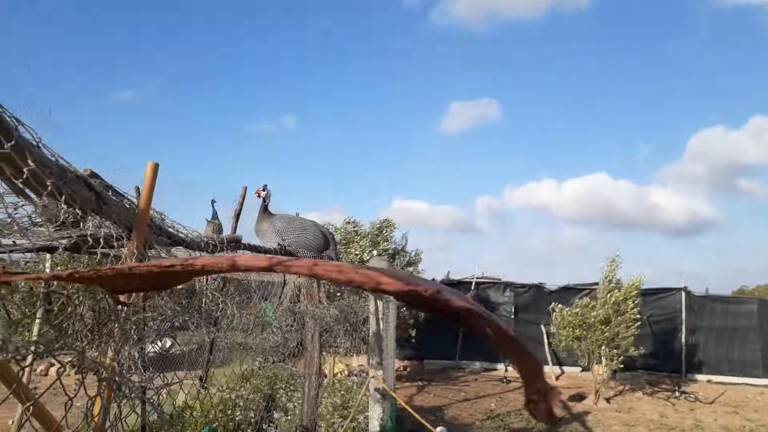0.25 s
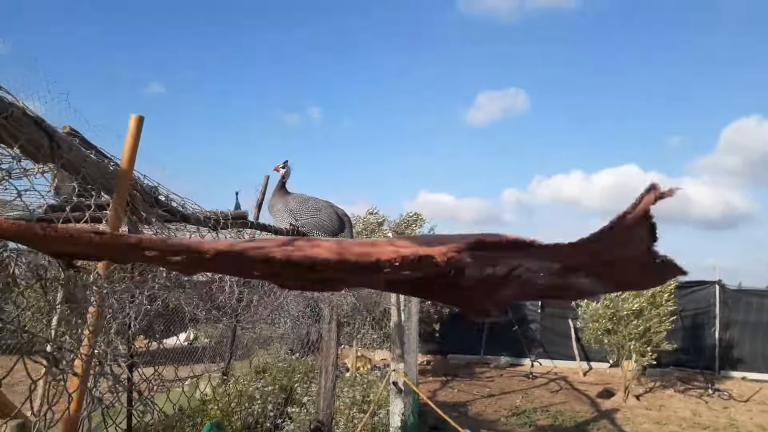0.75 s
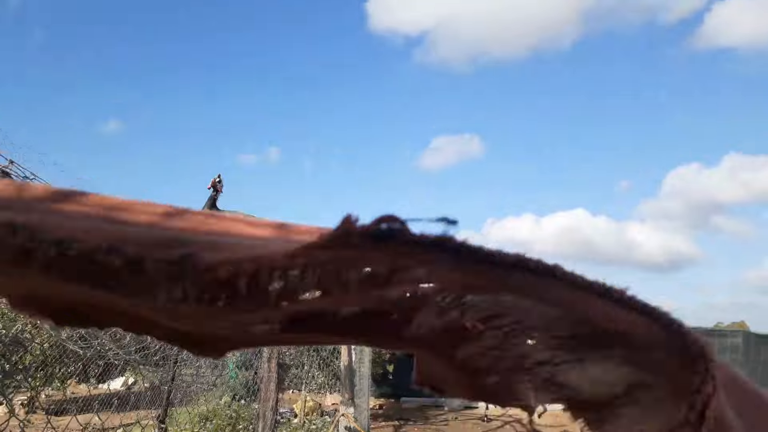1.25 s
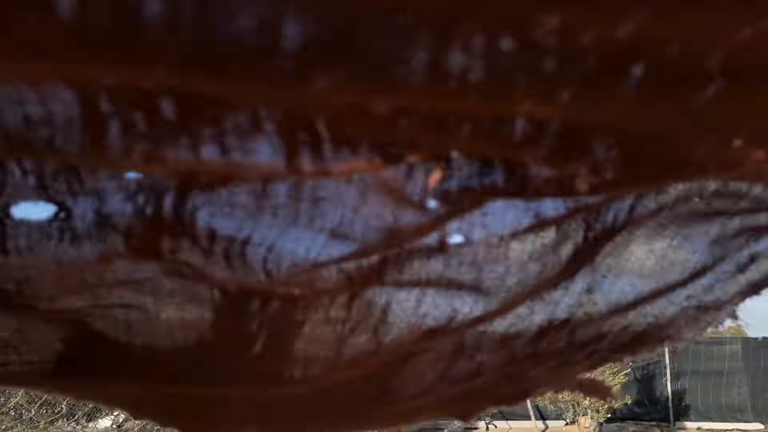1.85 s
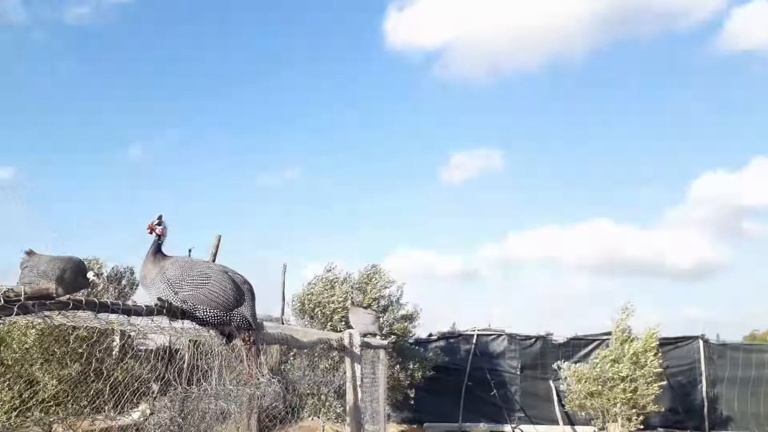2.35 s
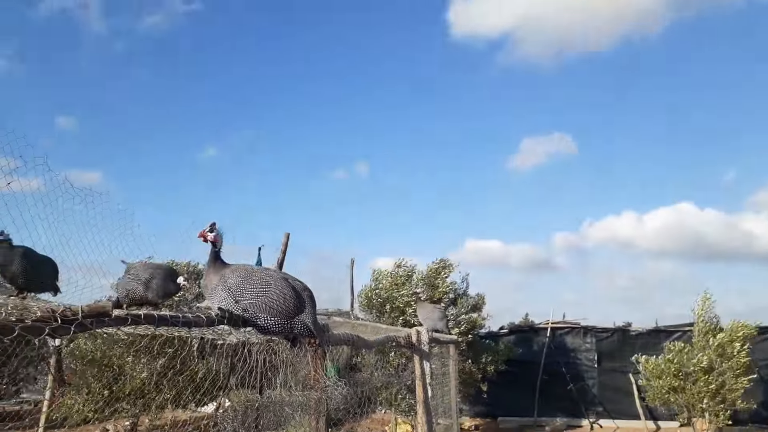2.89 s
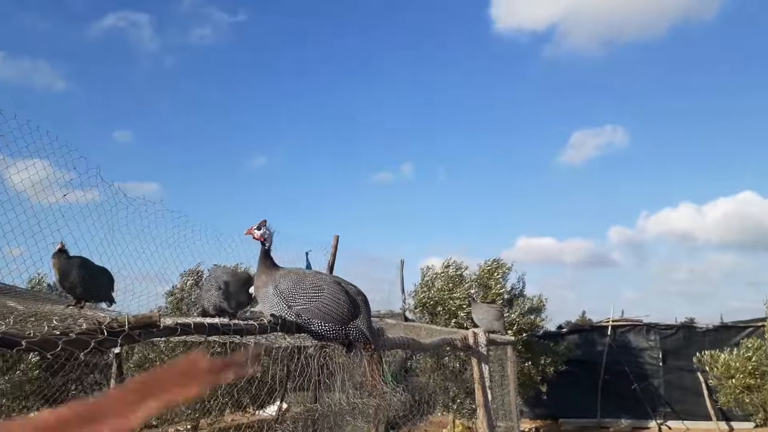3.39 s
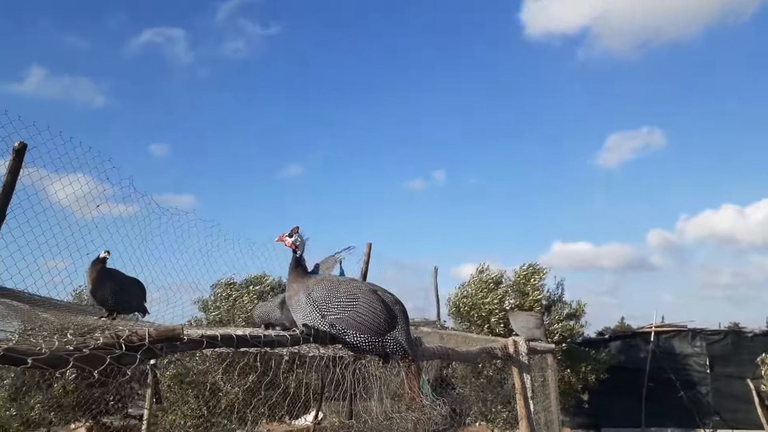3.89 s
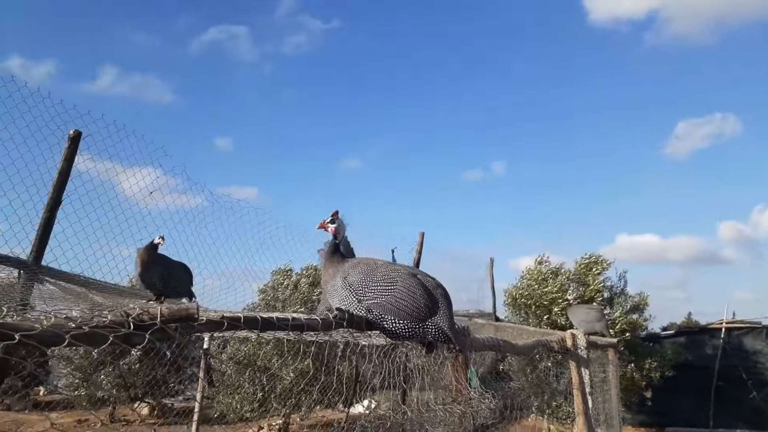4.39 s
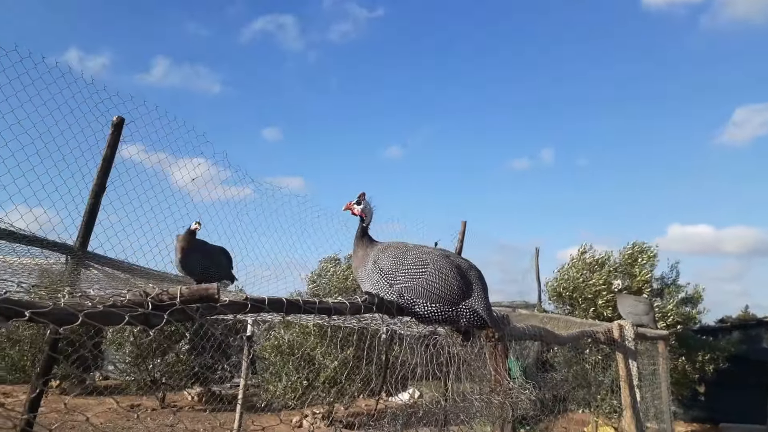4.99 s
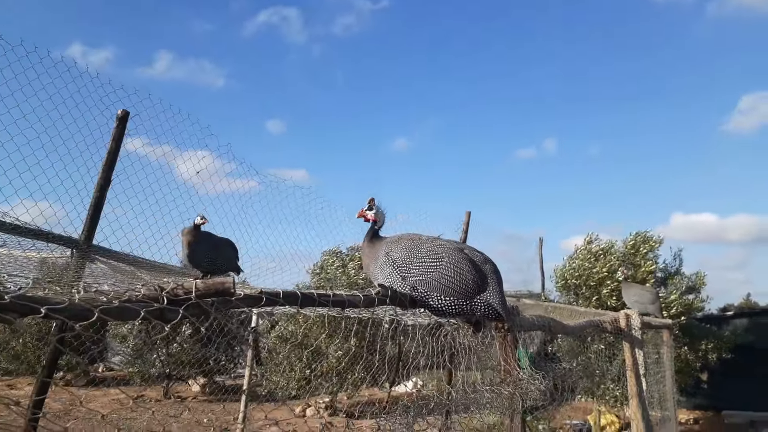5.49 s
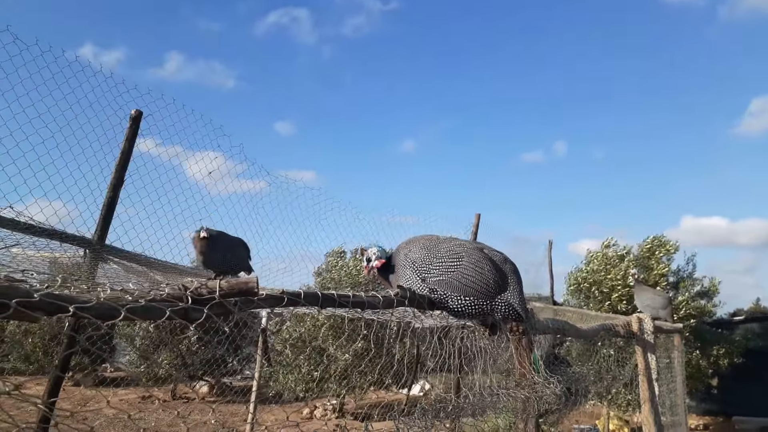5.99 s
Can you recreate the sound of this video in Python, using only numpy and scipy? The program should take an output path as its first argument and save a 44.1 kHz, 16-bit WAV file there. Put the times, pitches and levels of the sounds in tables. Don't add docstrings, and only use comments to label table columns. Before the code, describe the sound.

Outdoors in a wire pen, a guineafowl a few metres to the left fires off harsh, buzzy barks, then a rough scream, a hoarse two-part rasp and a short rolling trill. More quick barks follow, mixed with duller clucks, perhaps from a second bird, and small squeaks. Wind thumps hard on the handheld stereo microphone at first, then eases to softer buffeting. The yard adds only a faint short echo.

```python
import sys
import numpy as np
from scipy import signal
from scipy.fft import rfft, irfft, next_fast_len
from scipy.io import wavfile
from scipy.ndimage import uniform_filter1d, map_coordinates

SR = 44100
rng = np.random.default_rng(int(sys.argv[2]) if len(sys.argv) > 2 else 0)


def log_audio(samples):
    frames = np.atleast_2d(samples).T
    limited = np.clip(frames, -1, 1)
    pcm = np.round(limited * 32767).astype(np.int16)
    wavfile.write(sys.argv[1], SR, pcm)


def convert_level_to_amplitude(level_db):
    exponent = np.asarray(level_db, float) / 20
    return 10 ** exponent


N = 275625


def unit(x):
    return x / np.sqrt(np.mean(np.abs(x) ** 2) + 1e-20)


def along(points, hz):
    f, v = np.transpose(points)
    return np.interp(np.log(hz + 1), np.log(f + 1), v)


def over_time(points):
    return np.interp(np.arange(N) / SR, *np.transpose(points))


def wobble(rate_hz):
    knots = rng.standard_normal(int(N * rate_hz / SR) + 4)
    return map_coordinates(knots, [np.arange(N) * rate_hz / SR])


def filtered(x, response):
    m = next_fast_len(N + SR // 2)
    return irfft(rfft(x, m) * response(np.fft.rfftfreq(m, 1 / SR)), m)[..., :N]


GUST_TOP_DB = 8


def eddies(spectrum, per_second, gust_db):
    hits = rng.random((2, N)) < per_second / SR
    pops = hits * rng.standard_normal((2, N)) * convert_level_to_amplitude(1.5 * rng.standard_normal((2, N)))
    flow = .8 * unit(pops) + .45 * rng.standard_normal((2, N))
    lumps = convert_level_to_amplitude(np.minimum(gust_db, GUST_TOP_DB)) * flow
    return unit(filtered(lumps, lambda f: convert_level_to_amplitude(along(spectrum, f))))


# (time [s], level [dB])
WIND_DB = [(0, -24), (.2, -23), (.42, -35), (.58, -26), (1.0, -23.5), (1.36, -27), (1.6, -25.5), (2.3, -28),
           (3.0, -28.5), (3.3, -33), (3.4, -58), (3.51, -48), (3.6, -27.5), (3.97, -39), (4.07, -28.5),
           (4.85, -31), (5.35, -27), (5.85, -30)]
# (time [s], level [dB])
SLOW_EDDIES_DB = [(0, -4.5), (2.2, -3.5), (2.6, 0), (4.0, -1), (4.9, -2.5), (5.3, 1.5)]
# (frequency [Hz], density [dB per Hz])
SLOW_SPECTRUM = [(20, -33), (50, -10), (150, -0.5), (350, -6), (700, -19.5), (1500, -54.5)]
# (frequency [Hz], density [dB per Hz])
SMALL_SPECTRUM = [(100, -26), (350, -2), (800, -3), (1300, -5), (2100, -21), (5000, -68)]
# (time [s], peak [dB], port [0 left, 1 right])
THUMPS = [(0.106, -9, 0), (0.117, -16, 1), (0.147, -15, 0), (0.152, -6.5, 1), (0.211, -13.5, 0),
          (0.293, -7.5, 1), (0.577, -6, 0), (0.917, -10.5, 1), (0.954, -8, 0), (1.147, -9, 1),
          (1.148, -15, 0), (1.473, -3, 1), (1.529, -16, 1), (5.331, -10, 0)]


def wind():
    def gusts(depth_db, rate_hz):
        return np.array([depth_db * wobble(rate_hz), depth_db * wobble(rate_hz)])

    shared_db = gusts(3, 9)
    slow = eddies(SLOW_SPECTRUM, 150, shared_db + gusts(2.3, 20))
    small = eddies(SMALL_SPECTRUM, 420, shared_db + gusts(2.3, 18) + gusts(3.8, 45))
    level = convert_level_to_amplitude(over_time(WIND_DB) + np.array([[.1], [-.1]]))
    brighter = unit(level) ** .43
    steady = level * (convert_level_to_amplitude(over_time(SLOW_EDDIES_DB)) * slow + convert_level_to_amplitude(-2.0) * brighter * small)
    blows = np.zeros((2, N))
    for at_s, peak_db, port in THUMPS:
        blows[int(port), round(at_s * SR)] = -convert_level_to_amplitude(peak_db + 33)
    return steady + filtered(blows, lambda f: convert_level_to_amplitude(along(SMALL_SPECTRUM, f)))


def open_air():
    return convert_level_to_amplitude(-52) * unit(filtered(rng.standard_normal((2, N)), lambda f: 1 / (f + 1500) ** 2))


# (onset [s], length [s], peak [dB], pulse rate [Hz], windpipe [Hz])
BARKS = [(.066, .062, -20, 355, 2150), (.559, .082, -18, 372, 2040), (.736, .114, -17, 378, 1960),
         (1.631, .09, -22, 347, 2300), (3.002, .05, -17.5, 362, 2150), (3.101, .058, -16.5, 362, 2120),
         (3.376, .092, -14.5, 377, 2000), (3.615, .118, -20, 364, 2240), (3.874, .094, -19, 364, 2200),
         (4.685, .056, -19, 350, 2180), (4.791, .058, -18, 361, 2260), (4.906, .058, -17, 361, 2250),
         (5.051, .072, -19, 350, 2000), (5.389, .082, -19.5, 411, 2450)]
# (onset [s], length [s], peak [dB], pulse rate [Hz], windpipe [Hz])
SWELLS = [(.182, .058, -19, 355, 2170), (.285, .07, -19, 355, 2120), (.925, .041, -18, 378, 2200),
          (2.455, .055, -18, 338, 2350), (3.209, .058, -14, 362, 2146), (4.168, .084, -23.5, 342, 2150),
          (5.812, .068, -16, 368, 2220), (6.15, .064, -16, 367.5, 2250)]
# (onset [s], length [s], peak [dB], pulse rate [Hz], windpipe [Hz])
CLUCKS = [(.26, .02, -33, 355, 1900), (2.147, .062, -22.5, 338, 1850), (2.235, .058, -23.5, 338, 2050),
          (4.114, .034, -49, 342, 1900), (4.484, .062, -25, 330, 2200), (4.587, .062, -22, 350, 2080),
          (5.286, .082, -26, 405, 1800), (5.582, .092, -25.5, 335, 2040), (5.976, .068, -27.5, 368, 2120)]
# (onset [s], length [s], peak [dB], pulse rate [Hz], windpipe [Hz])
SIGHS = [
    (.42, .088, -17, 372, 2060),
    (1.451, .112, -15, 378, 1980),
    (2.335, .066, -22.5, 338, 1850),
    (2.528, .06, -22, 338, 2100),
    (4.372, .095, -25, 330, 2150),
]
# (attack [s], onset re crest [dB], after attack re crest [dB], release [s],
# throat re beak [dB], windpipe sink [share])
BARK = (.007, -12, -1, .032, -9, .12)
SWELL = (.006, -15, -6, .028, -7, .09)
CLUCK = (.006, -12, -1.5, .03, -4.5, .03)
SIGH = (.01, -13, -4, .062, -7, .08)
FADE_DB, SILENT_DB = -22, -85
THROAT_GAINS_DB, FLUTTER_DB = -6, 1.1
BEAK_HZ, BEAK_FALLS, BEAK_SCATTER = 4600, .06, .012
RATE_FALLS = .02
ROUGH, EASY_HZ, ROUGH_PER_HZ, CLEAREST = .36, 365, .006, .27


def short_notes(t):
    kinds = ((BARKS, BARK), (SWELLS, SWELL), (CLUCKS, CLUCK), (SIGHS, SIGH))
    rows = np.array(sorted((*note, *kind) for notes, kind in kinds for note in notes))
    rows = np.c_[rows, rng.standard_normal((len(rows), 1))]
    now = np.maximum(np.searchsorted(rows[:, 0], t, "right") - 1, 0)
    (start, length, peak_db, rate_hz, pipe_hz, attack, onset_db, open_db,
     release, throat_db, sinks, chance) = rows[now].T
    age = t - start
    release = np.minimum(release, .7 * length)

    def ramp(since, lasts):
        return np.clip((age - since) / lasts, 0, 1)

    hold = np.abs(length - release - attack) + 1e-3
    rise_db = onset_db * (1 - ramp(0, attack))
    rise_db = rise_db + open_db * ramp(0, attack) * (1 - ramp(attack, hold))
    level_db = peak_db + rise_db + FADE_DB * ramp(length - release, release)
    level_db = level_db + (SILENT_DB - level_db) * ramp(length, .006)
    level_db = np.where(age < 0, SILENT_DB, level_db)
    done = ramp(0, length)
    rate_now_hz = rate_hz * (1 - RATE_FALLS * (done - .4))
    pipe_hz = pipe_hz * (1 - sinks * done)
    beak_hz = BEAK_HZ * (1 - BEAK_FALLS * done + BEAK_SCATTER * chance)
    rough = np.maximum(ROUGH + ROUGH_PER_HZ * (EASY_HZ - rate_hz), CLEAREST)
    throat_db = throat_db + THROAT_GAINS_DB * (done - .5)
    trill_db = np.full(N, FLUTTER_DB)
    return np.array([level_db, rate_now_hz, pipe_hz, beak_hz, rough, throat_db, trill_db, done])


# (time [s], level [dB], pulse rate [Hz], windpipe [Hz], beak [Hz])
SCREAM = [
    (.97, -33, 371, 1950, 4450),
    (1.004, -14.5, 371, 1950, 4550),
    (1.042, -14, 371, 1840, 4630),
    (1.128, -20, 371, 1900, 4400),
    (1.24, -18, 371, 1850, 4450),
    (1.282, -22, 370, 2050, 4300),
    (1.303, -18.5, 370, 2220, 4545),
    (1.311, -31, 370, 2250, 4600),
    (1.351, -35, 370, 2100, 4400),
]
# (time [s], level [dB], pulse rate [Hz], windpipe [Hz], beak [Hz])
RASP = [
    (1.705, -26, 347, 1900, 4300),
    (1.749, -29, 347, 1900, 4200),
    (1.79, -21.5, 347, 2090, 4400),
    (1.897, -25, 345, 1900, 4150),
    (1.922, -15, 372, 2099, 4680),
    (1.985, -23, 370, 1780, 4550),
    (2.013, -22, 337, 1730, 4300),
    (2.081, -28, 333, 1660, 4250),
    (2.099, -43.5, 333, 1650, 4250),
]
# (time [s], level [dB], pulse rate [Hz], windpipe [Hz], beak [Hz])
ROLL = [
    (2.626, -40, 351, 1757, 4400),
    (2.634, -25, 351, 1757, 4360),
    (2.927, -23.5, 351, 1764, 4370),
    (2.959, -39.5, 351, 1764, 4300),
]
# (roughness [0-1], throat re beak [dB], trill depth [dB])
SCREAM_VOICE, RASP_VOICE, ROLL_VOICE = (.26, -12, 1), (.33, -2, .4), (.22, -9, 4.5)


def performance(t):
    controls = short_notes(t)
    for call, voice in ((SCREAM, SCREAM_VOICE), (RASP, RASP_VOICE), (ROLL, ROLL_VOICE)):
        s, *curves = np.transpose(call)
        on = (t >= s[0]) & (t <= s[-1])
        moving = [np.interp(t[on], s, c) for c in curves]
        steady = [np.full(on.sum(), v) for v in (*voice, .5)]
        controls[:, on] = moving + steady
    return controls


def syrinx(rate_hz, rough, trill_db):
    jitter = .006 * wobble(40) + .06 * rough * wobble(300)
    cycles = np.cumsum(rate_hz * (1 + jitter)) / SR
    shut = np.diff(np.floor(cycles), prepend=0)
    clicks = unit(shut * convert_level_to_amplitude((.43 + 1.75 * rough) * wobble(250)))
    puffs = unit(np.exp(-(cycles % 1) / .7) * rng.standard_normal(N))
    trill = np.cos(2 * np.pi * 39.5 * (np.arange(N) / SR - 2.785))
    return clicks, puffs, trill_db * (trill - .5)


def resonances(modes, floor_hz):
    def response(f):
        total = 0
        for k, (centre, width, db) in enumerate(modes):
            total = total + (-1) ** k * convert_level_to_amplitude(db) * 1j * f * width / (centre ** 2 - f * f + 1j * f * width)
        return (1j * f / (floor_hz + 1j * f)) ** 4 * total
    return response


def moving_resonance(x, hz, width_hz):
    turn = np.exp(2j * np.pi * np.cumsum(hz) / SR)
    b, a = signal.butter(3, width_hz / SR)
    return unit(np.real(signal.lfilter(b, a, x / turn) * turn))


# (time [s], head turned away [dB], beak gape [dB], throat swelling [dB])
POSTURE = [(0, 3.5, -32, -4), (.5, -3.5, -27, -7), (.8, 1, -17, -7), (1.15, -2, -20, -5), (1.3, 2, -15, 0),
           (1.5, 2.5, -16, -5), (1.82, -4.5, -19, -3), (1.95, 3, -13, -7), (2.3, 7.5, -22, 0),
           (2.47, 1.5, -18, 3), (2.62, 8.5, -11, 1), (2.93, 6.5, -10, -1), (3.1, 0, -13, -7),
           (3.9, 3, -13, -8), (4.2, 4, -19, -3), (4.62, 6, -4, 2), (5.0, 6, -14, 0), (5.9, 5, -21, -3)]
# (frequency [Hz], width [Hz], level [dB])
THROAT = [(2750, 450, -11), (3306, 424, -5)]
# (frequency [Hz], width [Hz], level [dB])
BROW = [(6230, 450, -3.5), (6990, 400, -5)]
# (frequency [Hz], density [dB per Hz])
HISS = [(7000, -40), (7900, 3), (9500, 5.5), (11500, 7.5), (12500, 3.5), (15600, -9)]
PIPE_GAINS_DB, HISS_GAINS_DB = 2.5, 4


def chatter():
    t = np.arange(N) / SR
    level_db, rate_hz, pipe_hz, beak_hz, rough, throat_db, trill_db, done = performance(t)
    s, turn_db, gape_db, swell_db = np.transpose(POSTURE)
    pipe_db = np.interp(t, s, turn_db) + PIPE_GAINS_DB * (done - .5)
    throat_db = throat_db + np.interp(t, s, swell_db)
    hiss_db = np.interp(t, s, gape_db) + HISS_GAINS_DB * (done - .5)
    rough = np.clip(rough, 0, 1)
    rate_hz = rate_hz * (1 + .0016 * (np.clip(level_db, -45, 0) + 20))
    clicks, puffs, trill = syrinx(rate_hz, rough, trill_db)

    def mix(breath):
        breath = np.clip(breath, 0, 1)
        return np.sqrt(1 - breath) * clicks + np.sqrt(breath) * puffs

    def brow_response(f):
        return resonances(BROW, 5200)(f) / (1 + (f / 7500) ** 16)

    sag = 1 + .004 * (np.clip(level_db, -42, -22) + 22)
    pipe = moving_resonance(mix(.4 * rough), sag * pipe_hz + 50, width_hz=400)
    air_sac = moving_resonance(mix(.4 * rough), .74 * pipe_hz, width_hz=800)
    pipe = pipe + convert_level_to_amplitude(-7.5) * air_sac
    throat = unit(filtered(mix(1.6 * rough), resonances(THROAT, 2000)))
    beak = moving_resonance(mix(1.15 * rough), sag * beak_hz, width_hz=1000)
    brow = unit(filtered(mix(.39 + rough), brow_response))
    hiss = unit(filtered(puffs + .31 * rng.standard_normal(N), lambda f: convert_level_to_amplitude(along(HISS, f))))
    upper = beak + convert_level_to_amplitude(-11.5) * brow + convert_level_to_amplitude(throat_db + 3.5) * throat + convert_level_to_amplitude(hiss_db - 1.6) * hiss
    lower = convert_level_to_amplitude(pipe_db + .45 * trill - 2.5) * pipe
    return convert_level_to_amplitude(level_db - 2.45) * (convert_level_to_amplitude(trill) * upper + lower)


# (time [s], peak [dB], second partial [Hz], length [s])
SQUEAKS = [
    (0.263, -40, 2750, 0.019),
    (.288, -26, 3200, 0.0095),
    (0.918, -36, 2700, 0.028),
    (1.631, -29, 2900, .022),
    (2.234, -27, 2780, 0.03),
    (4.373, -30, 3080, 0.049),
    (4.587, -27, 2940, 0.021),
    (5.292, -30, 3200, .066),
    (6.151, -28.5, 2950, 0.033),
]
# (multiple [1], level [dB])
SQUEAK_PARTIALS = [(1, -7), (2, 6), (3, -5), (4, -12.5)]


def squeaks():
    out, hush = np.zeros(N + SR), np.ones(N + SR)
    for at_s, peak_db, second_hz, length_s in SQUEAKS:
        u = np.arange(round(length_s * SR)) / (length_s * SR)
        glide = .00084 / length_s * np.sin(2.2 * u - .8)
        jitter = .039 * rng.standard_normal(len(u))
        phase = np.pi * np.cumsum(second_hz * (1 + glide + jitter)) / SR
        tone = 0
        for k, level_db in SQUEAK_PARTIALS:
            extra_db = 133 * length_s if k == 1 else 0
            tone = tone + convert_level_to_amplitude(level_db + extra_db) * np.sin(k * phase)
        start = round(at_s * SR)
        out[start:][:len(u)] += convert_level_to_amplitude(peak_db) * np.sin(np.pi * u ** .6) ** .7 * tone
        hush[start:][:len(u)] -= .4 * np.sin(np.pi * u)
    return out[:N], hush[:N]


# (frequency [Hz], level [dB])
LEFT_EAR_DB = [(1500, 0.5), (3000, 1.5), (4500, -5), (6000, 5), (7500, -7.5), (9500, 1)]
# (frequency [Hz], phase [rad])
BODY_LAG_RAD = [(1200, 0), (1900, -.55), (2700, -1.5), (3150, -1.3), (3700, 0)]
LEAD_S = .0004348


def direct(birds):
    side = np.array([[.5], [-.5]])

    def response(f):
        lead_rad = 2 * np.pi * f * LEAD_S / (1 + (f / 7400) ** 12) + along(BODY_LAG_RAD, f)
        return convert_level_to_amplitude(side * along(LEFT_EAR_DB, f) + 2.0) * np.exp(1j * side * lead_rad)

    return filtered(birds, response)


def scattered(x):
    z = signal.stft(x, nperseg=256)[2]
    shape = (2,) + z.shape
    field = rng.standard_normal(shape) + 1j * rng.standard_normal(shape)
    field = uniform_filter1d(field, size=5, axis=1)
    field = uniform_filter1d(field, size=24, axis=2)
    return signal.istft(z * unit(field), nperseg=256)[1][:, :N]


# (frequency [Hz], t60 [s])
YARD_T60 = [(2000, .26), (4500, 0.34), (9000, 0.3), (16000, 0.3)]


def yard(x):
    hz, t, z = signal.stft(rng.standard_normal((2, SR // 2)), SR, nperseg=256)
    decay = convert_level_to_amplitude(-60 * t / along(YARD_T60, hz)[:, None])
    tail = signal.istft(z * decay, SR, nperseg=256)[1]
    tail = tail / np.linalg.norm(tail[0])
    delayed = np.pad(x, (300, 0))[None]
    return signal.fftconvolve(delayed, tail, axes=1)[:, :N]


def scene():
    whistle, hush = squeaks()
    calls = hush * chatter() + whistle
    birds = filtered(calls, lambda f: 1 / (1 + (1000 / (f + 1)) ** 10))
    paths = direct(birds) + convert_level_to_amplitude(-3.5) * scattered(birds) + convert_level_to_amplitude(-16.5) * yard(birds)
    return paths + wind() + open_air()


def top_cut(x):
    return signal.sosfilt(signal.butter(12, 16320, fs=SR, output="sos"), x)


def record(dry):
    soft = dry / (1 + np.abs(dry / .9) ** 4) ** (1 / 4)
    mix = filtered(soft, lambda f: f < 15750)
    return top_cut(mix)


dry = scene()
out = record(dry)
log_audio(out)
```